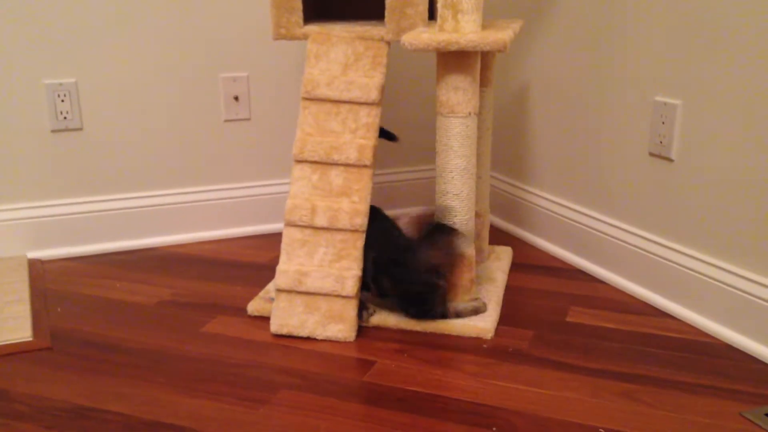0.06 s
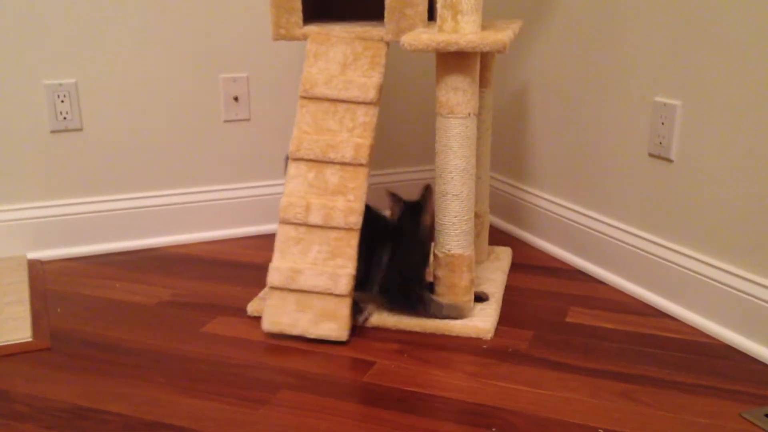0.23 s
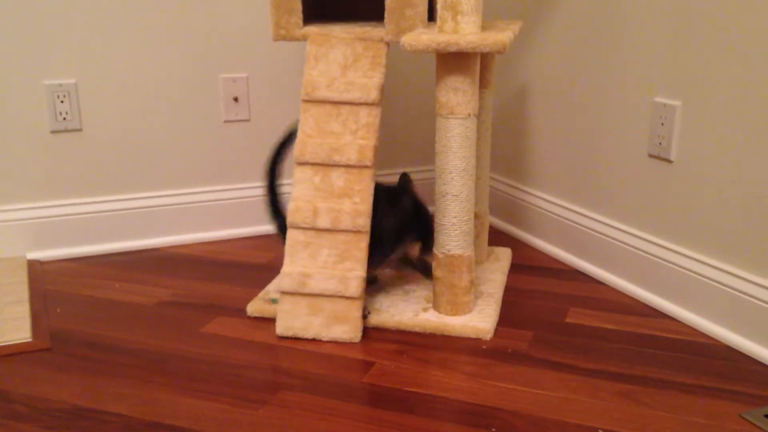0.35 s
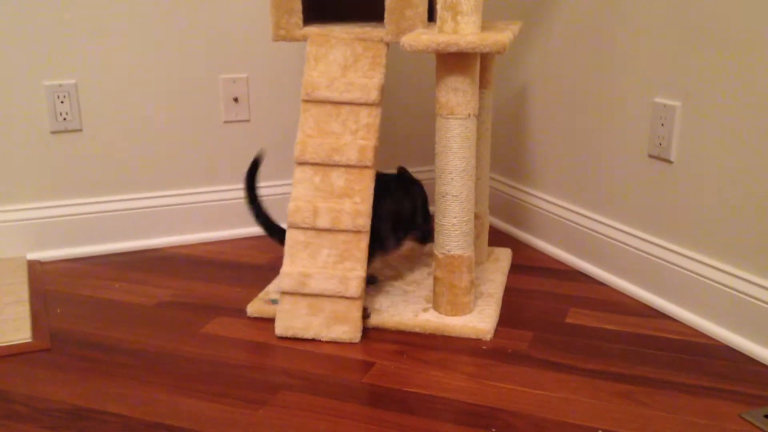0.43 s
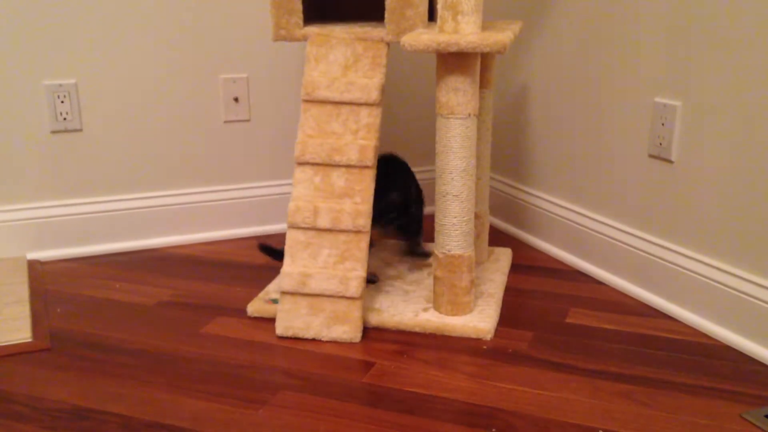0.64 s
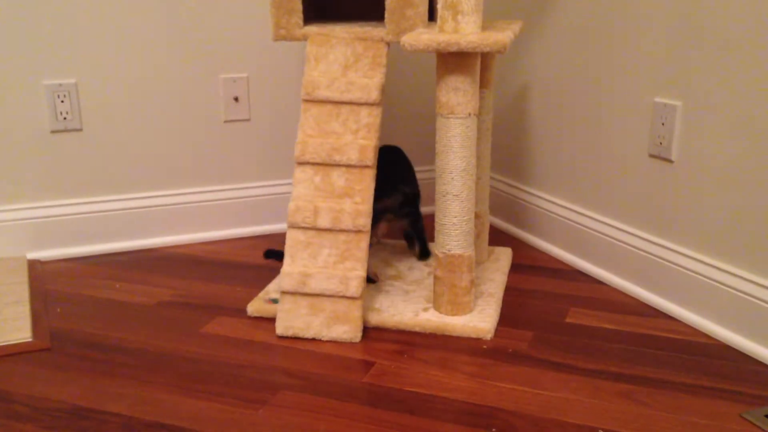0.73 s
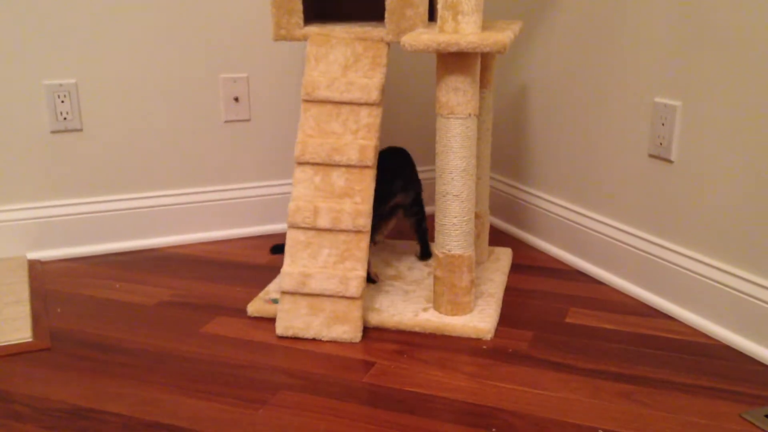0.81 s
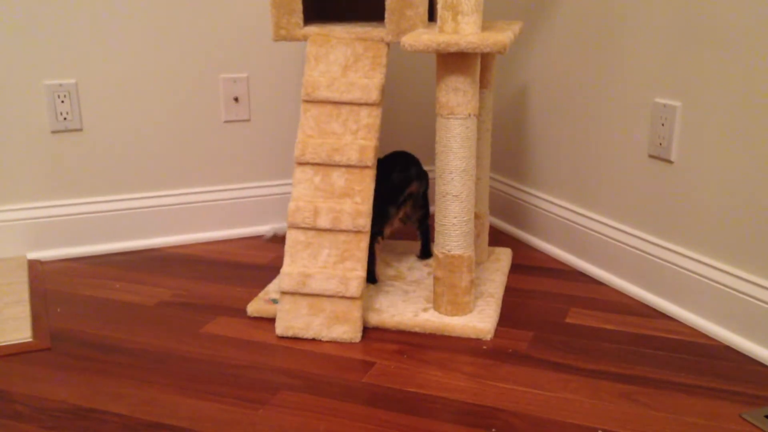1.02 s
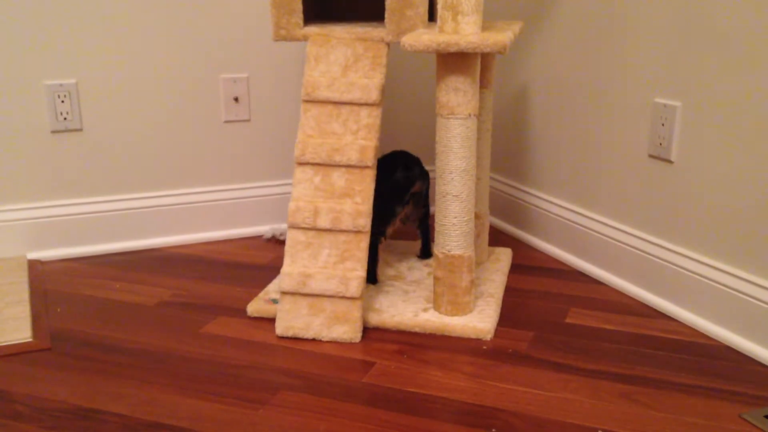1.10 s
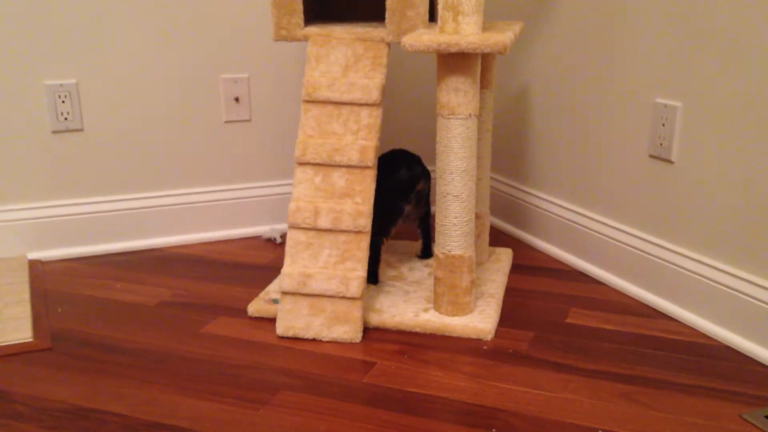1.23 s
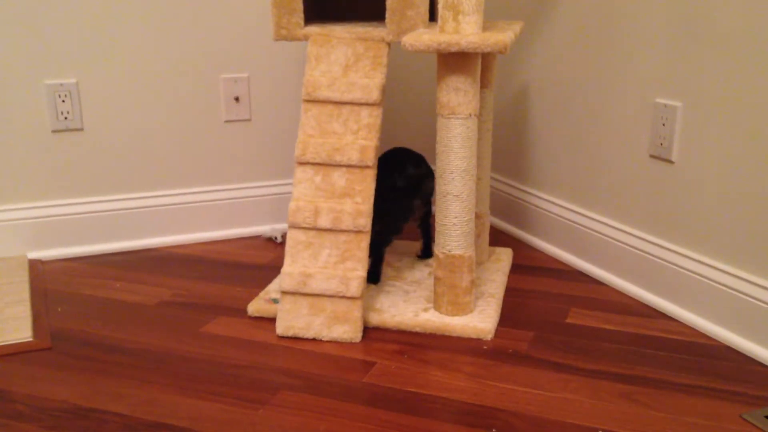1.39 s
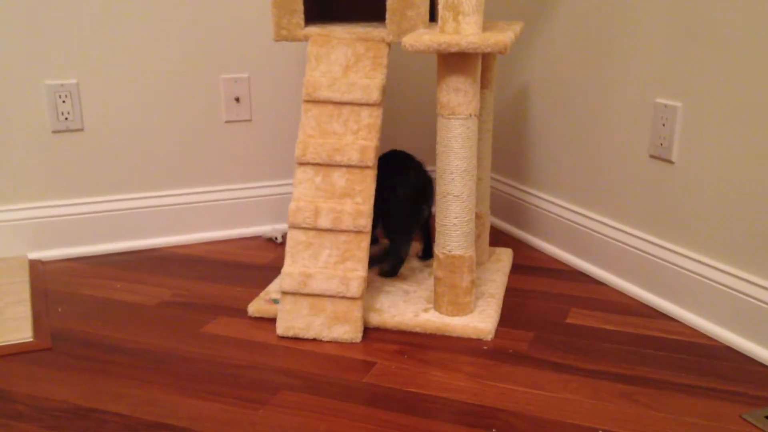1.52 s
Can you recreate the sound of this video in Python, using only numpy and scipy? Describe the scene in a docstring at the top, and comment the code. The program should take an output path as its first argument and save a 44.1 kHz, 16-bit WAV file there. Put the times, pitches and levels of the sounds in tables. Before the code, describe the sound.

A cat knocks about on a carpeted cat tree, heard nearby in a bare, quiet room. A thin hiss fades from the start, and claws scuff with a light knock at 0.2 seconds. Two sharp wooden clacks come at about 0.35 and 0.4 seconds, the second with a loud hollow thump that rings briefly. Soft paw steps follow until 1.5 seconds, with a faint scuff and tap around 1 second.

```python
"""A thin hiss fades, then claws scuff and a ramp knocks: a cat twists round on a carpeted cat tree.
It strikes two sharp clacks on the wood, bumps the tree with a hollow thump, then pads about its base.
Ramp and tree ring in damped modes; claws snap past carpet fibres, and paws push out a few dull cycles.
One microphone hears it all in a bare, quiet room with a wooden floor, near enough for each blow
to arrive distinctly before the room rings after it."""
import sys
import numpy as np
from scipy import signal
from scipy.fft import rfft, irfft
from scipy.io import wavfile

SR = 44100
rng = np.random.default_rng(int(sys.argv[2]) if len(sys.argv) > 2 else 0)


def generate_wav(sig):
    """Save sig (samples, or channels by samples) to the path in sys.argv[1] as 16-bit PCM at SR."""
    pcm = np.round(np.clip(np.atleast_2d(sig).T, -1, 1) * 32767).astype(np.int16)
    wavfile.write(sys.argv[1], SR, pcm)


N = 68355

# Room tone and the opening hiss. Each row: frequency in Hz, relative level in dB.
ROOM_TONE_COLOUR = [(20, -57), (45, -25), (110, -6), (280, -5), (400, -12), (750, -18), (1600, -19.5),
                    (3500, -15.5), (6000, -17), (10000, -18.5), (15000, -19.5)]
HISS_COLOUR = [(800, -13), (1500, -17.5), (2400, -10), (3200, -6), (4800, 0.5), (6000, -0.5), (9000, -14.5),
               (15000, -23)]
# How long the bare room rings. Each row: frequency in Hz, t60 in seconds.
ROOM_T60 = [(80, 0.35), (220, 0.28), (500, 1.12), (1000, 1.17), (2400, 0.91), (4000, 0.95), (7000, 0.77),
            (14000, 1.4)]
# Reverberation at the microphone. Each row: frequency in Hz, relative level in dB.
ROOM_COLOUR = [(60, -1), (120, -39), (220, -10.5), (350, 0.5), (520, 5), (900, -4), (2400, 1), (4000, -5),
               (7000, -1), (14000, -3)]
# Rumble of the cat's shifting weight. Each row: frequency in Hz, relative level in dB.
SHIFT_COLOUR = [(25, -8), (60, 0.5), (100, 3), (200, 2), (300, -10.5), (450, -37), (1500, -82)]
# The rumble's rise and fall. Each row: time in seconds, level in dB.
SHIFT_LEVEL = [(0, -67), (.15, -73), (.4, -61), (.55, -52.5), (.83, -67), (1.0, -73.5), (1.55, -77)]
# Soft low pulses: paw steps and swells of the ring after the thump.
# Each row: start in seconds, level in dB, pitch in Hz, time to peak in seconds.
LOW_PULSES = [(.218, -55, 92, .007), (.338, -58, 203, 0.0043), (.4315, -31, 155, .007),
              (.522, -40.5, 93, 0.012), (.606, -39, 206, 0.0069), (.722, -49.5, 213, 0.025),
              (.975, -63, 197, 0.0089), (1.176, -54.5, 244, 0.0038), (1.288, -66, 271, .01),
              (1.328, -69, 255, 0.0047), (1.444, -79, 183, 0.0037), (1.477, -62, 204, 0.0044)]
# Claws in the carpet. Each row: start in seconds, level in dB, length in seconds, tilt in dB per octave.
SCUFFS = [(.190, -48, 0.018, -1), (.2212, -55.5, 0.0058, 17), (.362, -50.5, 0.0048, 4),
          (.388, -64, 0.054, -1), (.538, -60.5, .006, 10), (.984, -60.5, 0.031, 0.5),
          (1.01, -70.5, 0.069, 3.5)]
# Hard taps on wood. Each row: start in seconds, relative strength in dB, crunch decay in seconds,
# tilt in dB per octave.
CLACKS = [(.3394, -36, 0.0032, -2), (.3412, -30.5, .0032, -0.27), (.3635, -53, 0.0077, 0),
          (.4225, -28.5, 0.0031, -1.56), (.4425, -69, .005, -4), (.4465, -38.5, 0.0028, -1),
          (.470, -46.5, 0.0088, 1.5), (.481, -40.5, 0.006, 0), (.487, -42, 0.0016, -3),
          (.9858, -51, 0.00098, 2), (1.0455, -67.5, 0.0026, -5.5)]
# Spectra of a scuff and a tap before tilting. Each row: frequency in Hz, relative level in dB.
SCUFF_COLOUR = [(150, -6), (500, 4.5), (1000, 4), (2000, -6.5), (4000, -2), (6000, -11), (10000, -20.5),
                (15000, -37)]
CLACK_COLOUR = [(100, -30.5), (280, -5), (500, -11.5), (750, -6.5), (1400, -4), (1950, -3.5), (2500, 0),
                (3000, -7), (3600, -2.5), (4500, -9.5), (5600, -21.5), (7000, -21.5), (10000, -29.5),
                (15000, -33)]
# Blows on the ramp and the tree. Each row: start in seconds, gain in dB, bass cut-off in Hz.
RAMP_KNOCKS = [(.2002, -40, 220), (.2225, -47, 120), (.3455, -48, 200), (.9915, -62, 616)]
TREE_THUMPS = [(.4349, -18.5, 25.2), (.514, -44, 40)]
# Modes of the ramp, the tree, the tapped wood and a faintly humming panel.
# Each row: frequency in Hz, relative level in dB, t60 in seconds, swell time in seconds.
RAMP_MODES = [(257, 9.5, 0.048, .0015), (272.7, 6.5, 0.2, 0.043), (359, -11, 0.18, 0.0012),
              (523, -21, 0.026, 0.0012), (750, -8, 0.019, 0.0012), (940, 2, 0.016, 0.00013)]
TREE_MODES = [(44.5, -35, .3, .012), (92.9, -11.5, 0.3, 0.06), (103, 16.5, 0.083, 0.035),
              (135.9, -15, 0.37, 0.0067), (195.8, 11, 0.052, 0.01), (200.6, -13.5, 0.48, 0.09),
              (216.7, -14.5, .6, 0.093), (278.4, -18, 0.364, 0.0068), (302.5, -5.5, 0.097, 0.0067),
              (348.4, -7.5, 0.15, 0.039)]
WOOD_MODES = [(1320, -29.5, 0.019, 0.00077), (2656, -18, 0.015, 0.00071), (3610, -26.5, 0.015, 0.00077),
              (4540, -28.5, 0.0058, 0.00027)]
PANEL_MODES = [(746, -64, 0.5, .003)]


def amp(db):
    """Decibels to gain."""
    return 10 ** (np.asarray(db) / 20)


def unit_rms(x):
    """Scales to unit rms."""
    return x / np.sqrt(np.mean(x ** 2) + 1e-20)


def read(points, hz):
    """Reads a table on a log-frequency axis."""
    f, value = np.transpose(points)
    return np.interp(np.log(hz + 1), np.log(f + 1), value)


def add(mix, start_s, sound):
    """Adds a sound at a time."""
    part = mix[max(round(start_s * SR), 0):][:len(sound)]
    part += sound[:len(part)]


def noise(colour):
    """Steady noise of a given colour."""
    gain = amp(read(colour, np.fft.rfftfreq(N, 1 / SR)))
    return unit_rms(irfft(rfft(rng.standard_normal(N)) * gain, N))


def colour_filter(colour, tilt_db, size=2048):
    """Causal response of unit energy with a given colour, tilted about 2 kHz."""
    hz = abs(np.fft.fftfreq(size, 1 / SR))
    octaves = np.log2(np.maximum(hz, 200) / 2000)
    log_gain = np.log(amp(read(colour, hz) + tilt_db * octaves))
    minimum_phase = np.exp(np.conj(signal.hilbert(log_gain)))
    response = np.fft.ifft(minimum_phase).real[:size // 2]
    return response / np.linalg.norm(response)


def room_tone(t, tone_db=-67.5, hiss_db=-55, hiss_t60=0.89):
    """The quiet room's steady background, with a thin hiss dying away at the start."""
    return amp(tone_db) * noise(ROOM_TONE_COLOUR) + amp(hiss_db - 60 * t / hiss_t60) * noise(HISS_COLOUR)


def reflections(gap_s=0.0021, build_s=0.006, size=512):
    """Dense reflections build up just behind the direct sound, then die at their own speed in each band."""
    hz, t, bands = signal.stft(rng.choice([-1., 1.], N), SR, nperseg=size)
    t60 = np.maximum(read(ROOM_T60, hz), .05)[:, None]
    decay = amp(read(ROOM_COLOUR, hz)[:, None] - 60 * t / t60)
    equal_energy = np.sqrt(2 * np.log(1000) / (t60 * SR))
    tail = signal.istft(bands * decay * equal_energy, SR, nperseg=size)[1][:N]
    since_gap = np.maximum(np.arange(N) / SR - gap_s, 0)
    return tail * (1 - np.exp(-since_gap / build_s))


def room_ring(direct, t, cycle_s=.24, patterns=3):
    """Three reflection patterns crossfade in turn, keeping the room's tail smooth and free of tones."""
    shares = [np.maximum(np.cos(2 * np.pi * (t / cycle_s + k / patterns)), 0) for k in range(patterns)]
    shares /= np.linalg.norm(shares, axis=0)
    return sum(signal.fftconvolve(direct * share, reflections())[:N] for share in shares)


def weight_shift(t):
    """The base rumbles as the cat shifts its weight."""
    return amp(np.interp(t, *np.transpose(SHIFT_LEVEL))) * noise(SHIFT_COLOUR)


def low_pulse(db, hz, peak_s):
    """A few dull cycles rise and fall: a paw step, or a swell of the ring after the thump."""
    t = np.arange(SR // 4) / SR
    envelope = (t / peak_s * np.exp(1 - t / peak_s)) ** 2
    return amp(db) * envelope * np.sin(2 * np.pi * hz * t)


def scuff(db, length_s, tilt_db, grain_db=3):
    """A short stroke of carpet fibres snapping past a claw."""
    n = int(length_s * SR)
    friction, roughness = rng.standard_normal((2, N))[:, :n]
    grains = unit_rms(friction * amp(grain_db * roughness) * np.sqrt(np.hanning(n)))
    return amp(db) * signal.fftconvolve(grains, colour_filter(SCUFF_COLOUR, tilt_db))


def frame_ring(modes, cut_hz):
    """Damped modes swell as a blow spreads through the frame; a lighter blow stirs less bass."""
    t = np.arange(SR) / SR
    motion = np.zeros(SR)
    for hz, db, t60, swell_s in modes:
        swell = 1 - np.exp(-(t / swell_s) ** 2)
        motion -= amp(db - 60 * t / t60) * swell * np.sin(2 * np.pi * hz * t)
    return signal.sosfilt(signal.butter(2, cut_hz, "high", fs=SR, output="sos"), motion)


def clack(db, decay_s, tilt_db, crunch=1.77, rise_s=0.0012, contact_s=.0008):
    """One hard contact and a quick crunch of smaller ones, coloured by the wood, which rings briefly."""
    t = np.arange(SR // 20) / SR
    force = rng.standard_normal(len(t)) * np.exp(-t / decay_s) * (1 - np.exp(-t / rise_s))
    force *= crunch / np.linalg.norm(force)
    force[round(contact_s * SR)] += 1  # the hard contact
    tap = signal.fftconvolve(force, colour_filter(CLACK_COLOUR, tilt_db))
    wood = frame_ring(WOOD_MODES, cut_hz=520)[:len(tap)]
    return amp(db) * 10 * (tap / np.linalg.norm(tap) + .5 * wood)


def scene():
    """At the microphone, in mono: the cat's blows and steps, the room's answer and the room tone."""
    t = np.arange(N) / SR
    background = room_tone(t)
    cat = weight_shift(t)
    for events, source in ((CLACKS, clack), (SCUFFS, scuff), (LOW_PULSES, low_pulse)):
        for start_s, *settings in events:
            add(cat, start_s, source(*settings))
    for blows, modes in ((TREE_THUMPS, TREE_MODES), (RAMP_KNOCKS, RAMP_MODES)):
        for start_s, db, cut_hz in blows:
            add(cat, start_s, amp(db) * frame_ring(modes, cut_hz))
    add(cat, 0.97, frame_ring(PANEL_MODES, cut_hz=520))  # a panel hums on past the last taps
    return (cat + room_ring(cat, t) + background)[None]


def record(dry, edge_hz=15600):
    """The recorder's band limit takes off the highest treble."""
    lowpass = signal.firwin(511, edge_hz, window=("kaiser", 7), fs=SR)
    return signal.oaconvolve(dry, lowpass[None], "same")


dry = scene()
out = record(dry)
generate_wav(out)
```